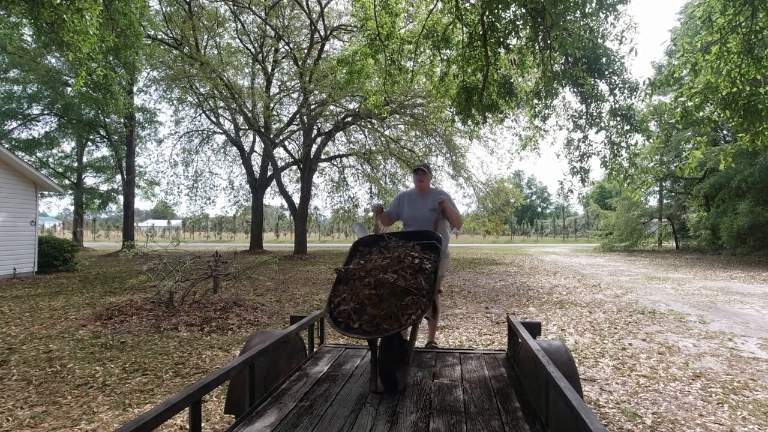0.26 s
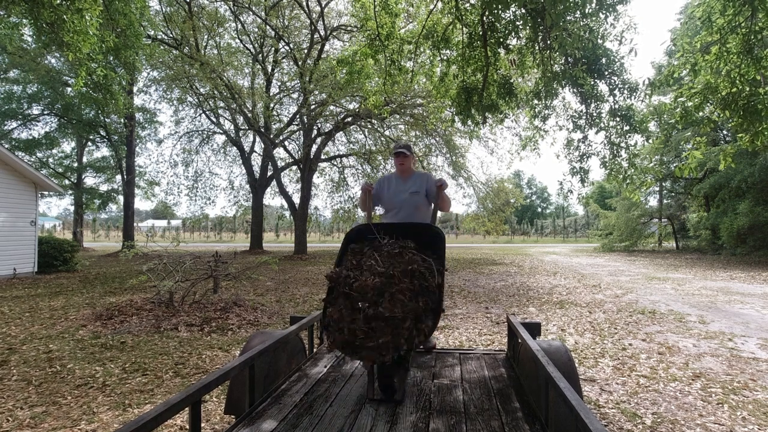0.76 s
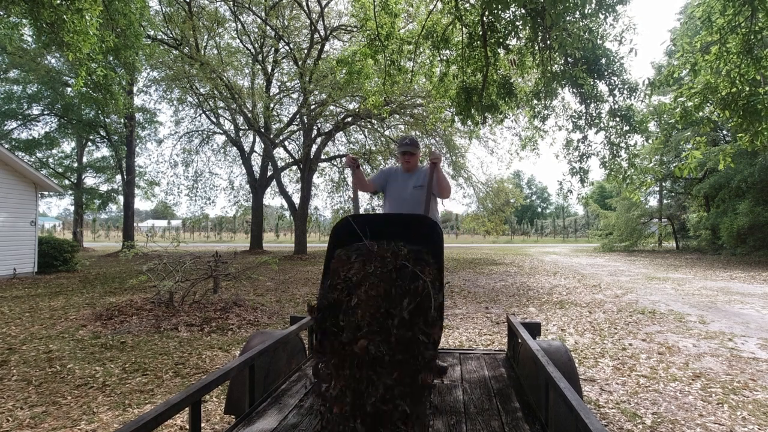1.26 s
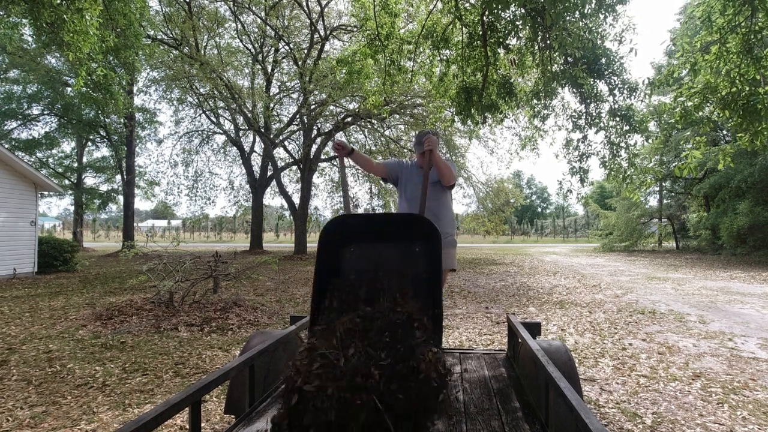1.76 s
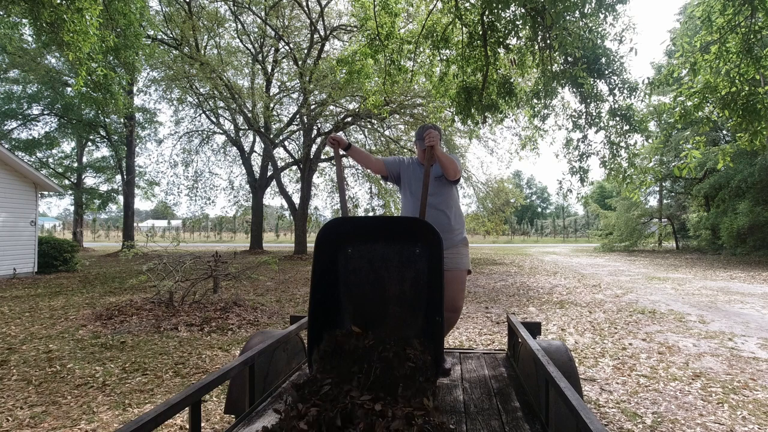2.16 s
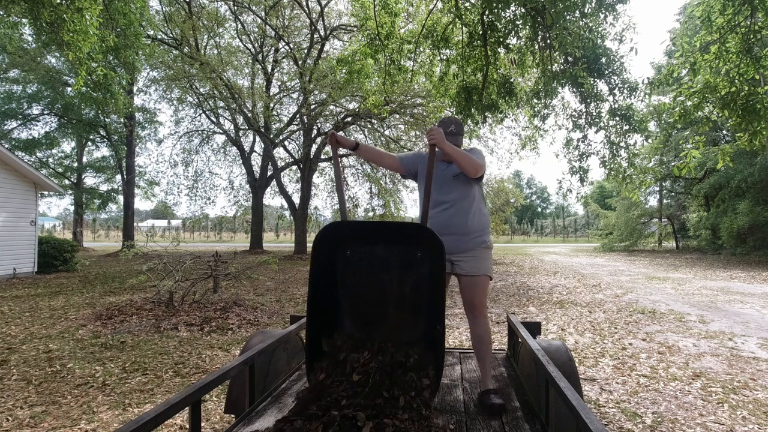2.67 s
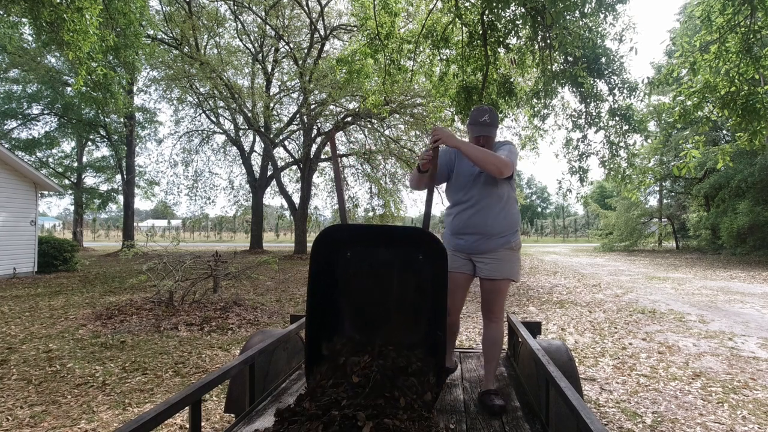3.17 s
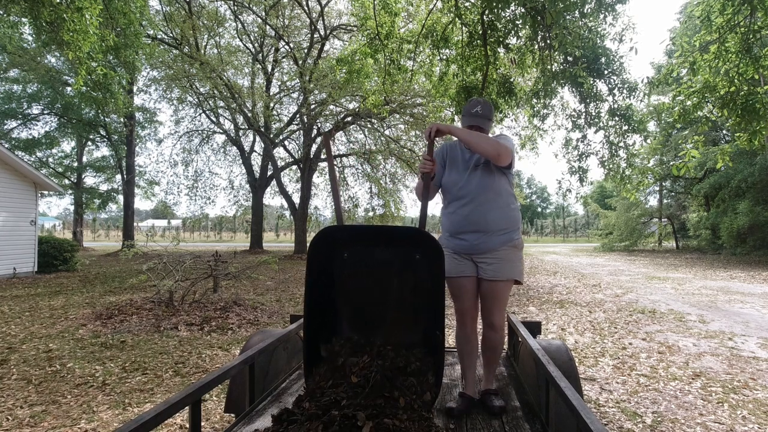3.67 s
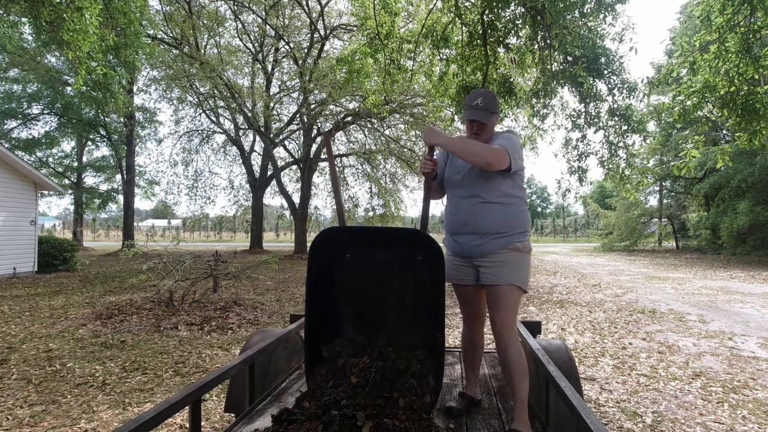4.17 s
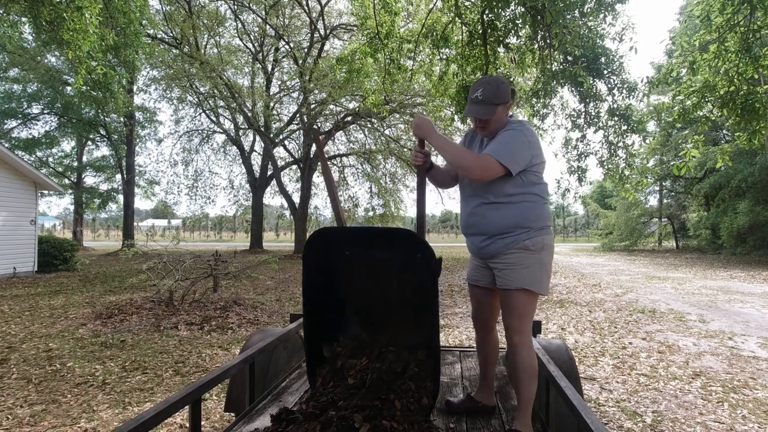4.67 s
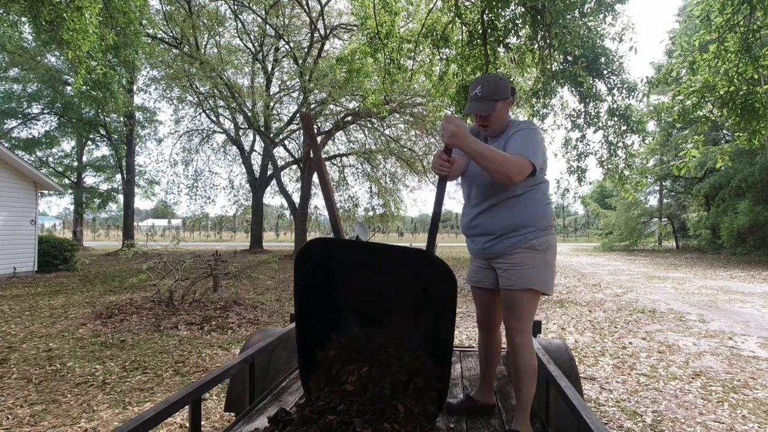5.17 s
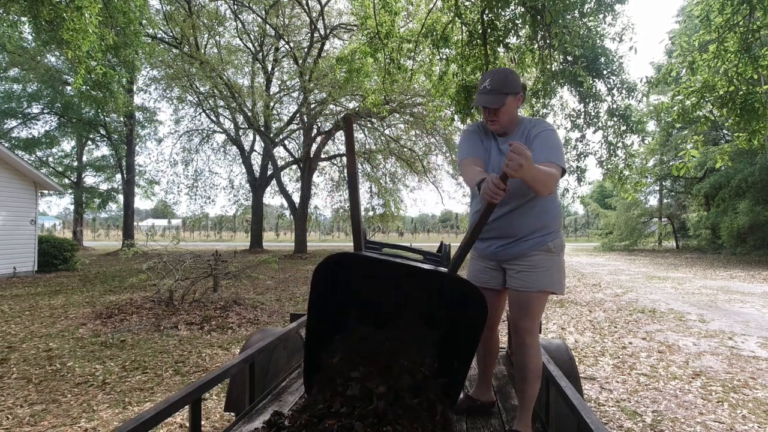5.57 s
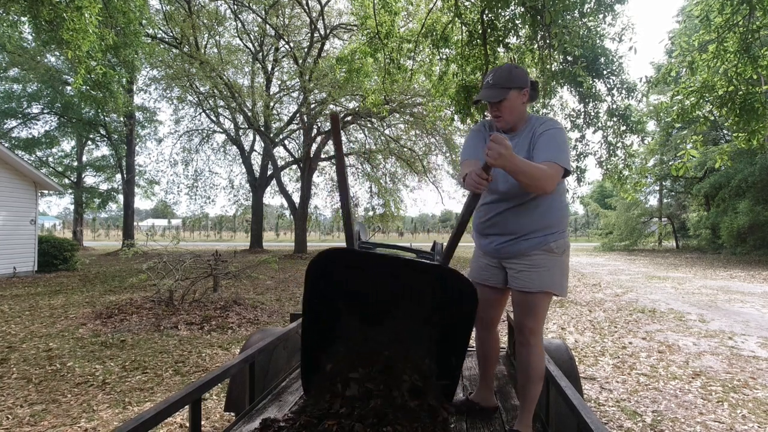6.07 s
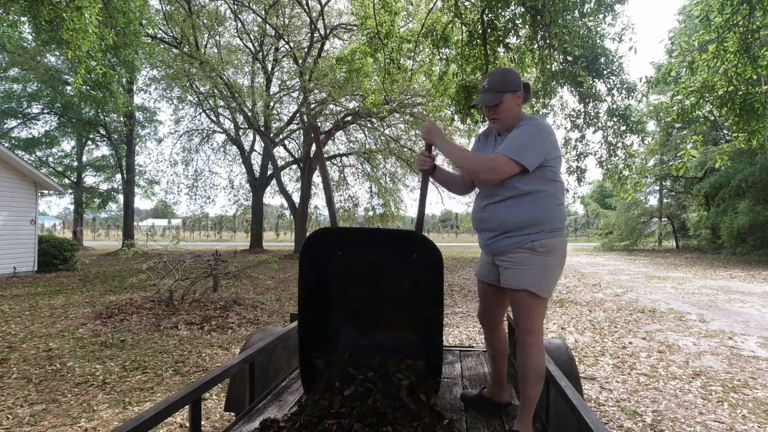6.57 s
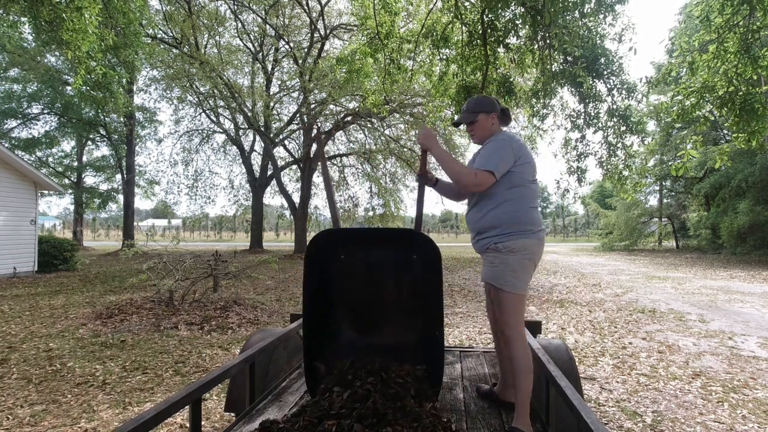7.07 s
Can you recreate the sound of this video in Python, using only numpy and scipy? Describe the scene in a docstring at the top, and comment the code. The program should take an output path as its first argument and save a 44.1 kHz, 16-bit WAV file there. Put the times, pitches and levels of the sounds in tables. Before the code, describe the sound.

Heard from a close microphone on the trailer bed: deep wheel rumble, then about a second and a half of bright leafy rustling with hollow knocks as the load slides out. One footstep thumps, quiet litter crunches and twigs snap. The hollow tub scrapes with a low groaning drone and gritty scratches, then slams down, rattling planks and steel, leaving a fading buzz in soft outdoor air.

```python
"""First wheel rumble, bumps and a faint leafy rustle: a plastic wheelbarrow rolls onto a plank trailer outdoors.
It is tipped and dry leaves and compost pour out; a foot lands, twigs snap, and the upended tub's rim grinds
over the boards. The tub drops back with a bouncing thud that sets the trailer booming.
Leaves, litter and grit are bursts of tiny random clicks, filtered; wood, tub and bed are ringing sines started
by clicks; the drone is clicks through narrow resonances; bird and squeaks are sines with moving pitch."""
import sys
import numpy as np
from scipy import signal
from scipy.fft import rfft, irfft
from scipy.io import wavfile
from scipy.ndimage import uniform_filter1d

SR = 44100
rng = np.random.default_rng(int(sys.argv[2]) if len(sys.argv) > 2 else 0)


def file_out(sig):
    """Save sig as 16-bit WAV at sys.argv[1]."""
    # one column per channel
    cols = np.atleast_2d(sig).T
    # limit, then scale
    lim = np.clip(cols, -1, 1)
    pcm = np.round(lim * 32767).astype(np.int16)
    wavfile.write(sys.argv[1], SR, pcm)


N = 323253
T = np.arange(N) / SR
# In all tables fade_s is the time to fade by 60 dB; levels are before the final mix.
# In colour tables only the differences between levels matter.


def from_db(db):
    """Turns decibels into a plain factor."""
    return 10 ** (np.asarray(db) / 20)


def rms_one(x):
    """Scales a sound to an average strength (rms) of 1."""
    return x / np.sqrt(np.mean(x ** 2) + 1e-20)


def drift(rate):
    """Slow chance with spread 1, made at every 40th sample and joined by straight lines."""
    r = np.exp(-80 * np.pi * rate / SR)
    noise = rng.standard_normal(N // 40 + 2002)
    slow = signal.lfilter([1], [1, -2 * r, r * r], noise)[2000:]  # the start-up is dropped
    return np.interp(np.arange(N) / 40, np.arange(len(slow)), rms_one(slow))


def cut(x, hz, kind, order=2):
    """Keeps what lies below ("low") or above ("high") a pitch."""
    return signal.sosfilt(signal.butter(order, np.clip(hz, 10, .45 * SR), kind, fs=SR, output="sos"), x)


def colour(x, spectrum, size=8192):
    """Causal filter of unit power with the given spectrum, falling steeply past its ends."""
    hz, db = np.transpose(spectrum)
    octave = np.log2(np.maximum(np.fft.rfftfreq(size, 1 / SR), 1))
    known = np.log2(hz)
    outside = np.abs(octave - np.clip(octave, known[0], known[-1]))
    level_db = np.interp(octave, known, db) - 24 * np.minimum(outside, 3)
    # folding the cepstrum forward in time makes the filter respond as early as it can
    cepstrum = irfft(np.log(from_db(level_db)))
    cepstrum[1:size // 2] *= 2
    cepstrum[size // 2 + 1:] = 0
    response = irfft(np.exp(rfft(cepstrum)))
    return signal.oaconvolve(x, response / np.linalg.norm(response))[:N]


def ring(x, hz, t60):
    """A unit click sets a dying sine of height 1 ringing."""
    r = from_db(-60 / (t60 * SR))
    w = 2 * np.pi * hz / SR
    return signal.lfilter([0, np.sin(w)], [1, -2 * r * np.cos(w), r * r], x + 1e-18)


def resonance(x, hz, width_hz):
    """Band-pass that keeps the power of white noise."""
    r = np.exp(-np.pi * width_hz / SR)
    gain = np.sqrt((1 - r * r) / 2)
    poles = [1, -2 * r * np.cos(2 * np.pi * hz / SR), r * r]
    return signal.lfilter(gain * np.array([1, 0, -1]), poles, x + 1e-18)


def grains(per_s, spread_db, clump_db):
    """Tiny random fractures of uneven size that come in clumps; rms 1."""
    height_db = spread_db * np.minimum(rng.exponential(1, N), 4)
    sizes = from_db(height_db) * rng.choice([-1, 1], N)
    born = rng.random(N) < per_s / SR
    return rms_one(born * sizes / np.sqrt(per_s) * from_db(clump_db * drift(24.5)))


def strikes(times, db, way=1):
    """One click for each contact."""
    out = np.zeros(N)
    out[np.clip((np.asarray(times) * SR).astype(int), 0, N - 1)] = from_db(db) * way
    return out


def dying(clicks, t60):
    """Envelope that jumps at each click and dies away."""
    return signal.lfilter([1], [1, -from_db(-60 / (t60 * SR))], clicks + 1e-18)


# a contact spreads over a few milliseconds as tub and planks give
CONTACT_S = 0.0038


def contact(envelope):
    """Rounds the attack of an envelope."""
    keep = np.exp(-1 / (CONTACT_S * SR))
    return signal.lfilter([1 - keep], [1, -keep], envelope)


def curve(rows, fade_db_per_s=200):
    """A level in dB through time, fading after its last point."""
    s, db = np.transpose(rows)
    return np.interp(T, s, db) - fade_db_per_s * np.maximum(T - s[-1], 0)


def swell(start_s, length_s, skew=1.0, roundness=0.84):
    """Envelope of one stroke, rising to 1 and falling; a skew over 1 makes it peak late."""
    part = np.clip((T - start_s) / length_s, 0, 1)
    inside = (part > 0) & (part < 1)
    out = np.zeros(N)
    out[inside] = np.abs(np.sin(np.pi * part[inside] ** skew)) ** roundness
    return out


def struck(modes, s, level_db):
    """Each blow strikes every mode with a random strength and sign."""
    shape = (len(s), len(modes))
    strength_db = rng.normal(0, 1.2, shape)
    way = rng.choice([-1, 1], shape)
    out = np.zeros(N)
    for k, (hz, db, t60) in enumerate(modes):
        out += ring(strikes(s, level_db + db + strength_db[:, k], way[:, k]), hz, t60)
    return out


# the tub flexes as it is pushed, so its resonances waver
FLEX_SHARE, FLEX_PER_S = .022, 7  # share of the pitch, wavers per second


def flex(x):
    """Bends the pitch of the tub's ringing a little, at random."""
    delay_s = FLEX_SHARE / (2 * np.pi * FLEX_PER_S) * drift(FLEX_PER_S)
    return np.interp(T + delay_s, T, x)


# colour of the open air: pitch_hz, level_db (per Hz)
AIR_COLOUR = [(22, 3), (35, -3.5), (58, 4.5), (85, -6.5), (120, -11.5), (170, -13.5), (235, -9),
              (300, -15.5), (500, -18.5), (900, -18), (1640, -23.5), (2300, -29), (7000, -42), (15000, -54)]
AIR_DB = -52.5


def open_air():
    """Soft low rumble and hiss of the yard, with a far-off hum, all from filtered noise."""
    air = colour(rng.standard_normal(N), AIR_COLOUR)
    hum = resonance(rng.standard_normal(N), 110.5, 18.3)
    return from_db(AIR_DB) * air + from_db(-57.0) * hum


BIRD_S, BIRD_LENGTH_S, BIRD_DB = 3.25, .16, -66
BIRD_HZ, BIRD_FALL_HZ_PER_S = 2890, 300


def bird():
    """A far bird's thin, slightly falling whistle from the trees: one sine with a trembling pitch."""
    pitch = (BIRD_HZ - BIRD_FALL_HZ_PER_S * (T - BIRD_S)) * (1 + 0.0057 * drift(42))
    whistle = np.sin(2 * np.pi * np.cumsum(pitch) / SR)
    return from_db(BIRD_DB) * swell(BIRD_S, BIRD_LENGTH_S, skew=1.5) * whistle


# clods of compost slide down the tub: start_s, length_s, level_db
CLOD_SLIDES = [(0.627, 0.17, -42.5), (1.03, 0.16, -45.5), (1.23, 0.089, -56), (1.831, 0.56, -39.5)]


def clods():
    """Envelope of the sliding clods."""
    return sum(from_db(db) * swell(s, length, skew=0.5, roundness=1.0) for s, length, db in CLOD_SLIDES)


# how hard wheel and load shake the deck: time_s, level_db
DECK_SHAKE = [(0.0, -27.5), (0.25, -34.5), (0.54, -29.5), (1.32, -43), (1.34, -45.5), (2.08, -44.5),
              (2.14, -33), (2.39, -71), (2.6, -73)]
# colour of the deck's rumble under the wheel: pitch_hz, level_db (per Hz)
RUMBLE_COLOUR = [(22, -5), (35, -2), (55, 1), (70, -2.5), (90, -14), (125, -14), (170, -22)]
# colour of the load rubbing along the tub: pitch_hz, level_db (per Hz)
RUB_COLOUR = [(65, -17), (110, -27), (166, 0.5), (224, 3), (269, -9.5), (312, -0.5), (521, -7), (559, -2.5),
              (600, -2.5), (780, -19), (1320, -120)]
# loose planks and side rails: pitch_hz, level_db, fade_s (the fade counts only when they are struck)
RAIL_MODES = [(561, -7, 0.18), (696, -1, 0.063), (783, -2.5, 0.13), (945, -11, 0.058), (1083, -18, 0.28),
              (1290, -26, 0.029), (1440, -31, 0.035)]


def rolling():
    """The wheel and the shifting load shake the deck, rub along the tub and make the side rails chatter."""
    shake = from_db(curve(DECK_SHAKE))
    rub = from_db(-18) * shake + from_db(-16.5) * from_db(curve(LEAF_FLOW)) + from_db(-4.0) * clods()
    rumble_level = from_db(-2.0) * shake + from_db(-27) * clods()
    rumble = rumble_level * colour(grains(1800, spread_db=3.0, clump_db=4.0), RUMBLE_COLOUR)
    rubbing = colour(grains(1500, spread_db=1.0, clump_db=5.0) * rub, RUB_COLOUR)
    jolts = grains(400, spread_db=-7.0, clump_db=-2.0)
    chatter = rms_one(sum(resonance(jolts, hz, hz / 22) * from_db(0.72 * db) for hz, db, _ in RAIL_MODES))
    return rumble + from_db(-4.0) * rubbing + from_db(-23.0) * shake * chatter


# trailer bed on its springs: pitch_hz, level_db, fade_s
BED_MODES = [(34.4, -5, 1.4), (39.95, -11.5, 2.3), (58, 3.5, 0.29), (63.07, -4, 0.84), (83.4, -14.5, 0.37),
             (115, -10.5, 0.57)]


def deck_boom(s, level_db, boom_hz):
    """The bed swings on its springs; the bending modes near the pitch of the blow answer most."""
    swing = np.zeros(N)
    for k, (hz, db, t60) in enumerate(BED_MODES):
        off_pitch_db = 14 * np.abs(np.log2(hz / boom_hz))  # 14 dB weaker per octave away
        swing += ring(strikes(s, level_db + db - off_pitch_db), hz, t60) * (-1) ** k
    return cut(swing, 110, "low")


# colour of the loaded tub's dull thump: pitch_hz, level_db (per Hz)
THUMP_COLOUR = [(110, -7), (170, -10), (250, -6), (400, -9), (700, -29.5)]
THUMP_T60_S = .045


def thump(s, level_db):
    """The dull part of a blow: one firm push, then a short shudder."""
    blow = strikes(s, level_db)
    shudder = rng.standard_normal(N) * contact(dying(blow, THUMP_T60_S))
    return colour(from_db(14.0) * blow + from_db(-6.5) * shudder, THUMP_COLOUR)


# colour of the planks' dry knock: pitch_hz, level_db (per Hz)
PLANK_COLOUR = [(300, -1), (480, -3.5), (700, 6), (900, -0.5), (1400, -6), (2000, -17.5), (5000, -28)]


def clack(s, level_db):
    """Loose planks knock and rattle on unevenly, and the side rails ring."""
    knock = strikes(s, level_db)
    rattle = dying(knock, 0.037) + from_db(-19.5) * dying(knock, 0.74) * from_db(1.1 * drift(40))
    planks = colour(rng.standard_normal(N) * contact(rattle), PLANK_COLOUR)
    return from_db(-4.0) * planks + struck(RAIL_MODES, s, level_db - 4.0)


# hollow tub and its longer-ringing steel frame: pitch_hz, level_db, fade_s
TUB_MODES = [(140, -1.5, 0.11), (193, -7, 0.24), (216.8, -4, 0.38), (227.8, -6, 0.36), (245.5, -9, 0.45),
             (288, -15, 0.45), (322, -15, 0.5), (344.1, -15, 0.74), (402, -14.5, 0.46), (453, -22, 0.8),
             (523, -22, 0.5), (795, -29, 1), (822, -28, 0.57), (930, -27, 0.24), (1030, -31, 0.4),
             (1945, -36, 0.8)]
# the wheel drops over gaps between planks: time_s, knock_db, deck_boom_db, boom_pitch_hz
WHEEL_BUMPS = [(.01, -43, -50, 45), (0.069, -45, -45, 100), (0.422, -48, -24, 38), (0.51, -48, -24.5, 42.3),
               (.567, -38, -48, 110), (0.612, -40.5, -26.5, 57), (0.76, -62, -25, 58),
               (0.839, -38.5, -37, 59.7)]


def wheel_bumps():
    """The soft tyre mostly rocks the deck, with a little knock from tub and planks."""
    s, db, boom_db, boom_hz = np.transpose(WHEEL_BUMPS)
    knocks = thump(s, db) + struck(TUB_MODES, s, db) + from_db(-2.5) * clack(s, db)
    return deck_boom(s, boom_db, boom_hz) + knocks


# debris jolted loose lands on the deck: time_s, level_db, fade_s
DEBRIS_LANDINGS = [(6.811, -30, 0.056), (6.828, -43, 0.71), (6.868, -32.5, 0.17), (6.916, -34, 0.18)]


def debris():
    """A short, dying crunch for each handful."""
    landing = contact(sum(dying(strikes([s], db), t60) for s, db, t60 in DEBRIS_LANDINGS))
    crunch = grains(14000, spread_db=2.0, clump_db=2.0) * landing
    return colour(crunch, [(1200, 7.0), (2500, 0.5), (4100, -1.5), (6500, -6.5), (9000, -15.0), (15000, -33.0)])


# the steel frame buzzes on after the drop
DROP_S, BUZZ_HZ, BUZZ_WIDTH_HZ, BUZZ_DB, BUZZ_T60_S = 6.824, 801, 30, -45, 2.3


def frame_buzz():
    """Loose steel parts chatter in one narrow resonance and die away."""
    clicks = grains(900, spread_db=-4.0, clump_db=-5.0)
    chatter = resonance(resonance(clicks, BUZZ_HZ, 3 * BUZZ_WIDTH_HZ), BUZZ_HZ, BUZZ_WIDTH_HZ)
    return rms_one(chatter) * dying(strikes([DROP_S], BUZZ_DB), BUZZ_T60_S)


# a foot lands on the deck: heel first, then the sole, then the walker's weight
STEP_S, SOLE_LAG_S, WEIGHT_LAG_S = 2.7287, 0.0075, .039
# the shoe twists on grit as it takes the weight
SCUFF_S, SCUFF_LENGTH_S, SCUFF_HZ, SCUFF_WIDTH_HZ, SCUFF_DB = 2.76, 0.043, 1280, 520, -43


def footfall():
    """The heel clacks, the sole thumps and shakes the tub, the weight swings the bed as the shoe scuffs."""
    heel, sole, weight = STEP_S, STEP_S + SOLE_LAG_S, STEP_S + WEIGHT_LAG_S
    planks = clack([heel], level_db=-24) + clack([sole], level_db=-29)
    shoe = cut(thump([heel], level_db=-25) + thump([sole], level_db=-14), 100, "high")
    bed = deck_boom([weight], level_db=-20.0, boom_hz=63.0)
    bed = bed + thump([weight], level_db=-23.0) + clack([weight], level_db=-35)
    tub = struck(TUB_MODES, [sole], level_db=-30.5) + struck(TUB_MODES, [weight], level_db=-31.5)
    grit = grains(2500, spread_db=1.0, clump_db=0.5)
    for _ in range(2):
        grit = resonance(grit, SCUFF_HZ, SCUFF_WIDTH_HZ)
    scuff = from_db(SCUFF_DB) * swell(SCUFF_S, SCUFF_LENGTH_S, skew=0.37) * rms_one(grit)
    return planks + shoe + bed + scuff + tub


# shoes and rim sweep through the litter: start_s, length_s, crunch_db, hiss_db
LITTER_SWEEPS = [(3.5, 0.14, -57.5, -69), (3.756, 0.39, -64, -66.5), (4.197, 0.057, -52.5, -66),
                 (4.294, 0.71, -56.5, -68), (4.544, 0.32, -51.5, -77), (4.672, 0.13, -48, -73),
                 (4.877, 1, -53, -59), (5.42, 0.72, -54.5, -50), (6.072, 0.72, -49, -57.5),
                 (6.506, 0.33, -47, -55.5), (7.048, 0.25, -58, -64)]
# colour of the litter's crunch: pitch_hz, level_db (per Hz)
CRUNCH_COLOUR = [(500, -1), (900, 1.5), (1350, -1), (1700, 6), (2050, -2.5), (2800, -0.5), (3800, -2),
                 (5000, -6), (7000, -10), (9500, -32), (15000, -39)]
# colour of the litter's fine hiss: pitch_hz, level_db (per Hz)
HISS_COLOUR = [(3000, -6.5), (5500, -2.5), (7600, -2), (9300, -7), (10500, -14), (12500, -16), (15500, -25)]


def litter():
    """Shoes and the rim of the tub crush and push the leaves that lie on the boards."""
    strokes = np.array([swell(s, length, skew=0.95, roundness=0.55) for s, length, _, _ in LITTER_SWEEPS])
    _, _, crunch_db, hiss_db = np.transpose(LITTER_SWEEPS)
    # overlapping strokes add in power
    coarse, fine = (np.sqrt(from_db(db) ** 2 @ strokes ** 2) for db in (crunch_db, hiss_db))
    crunch = colour(grains(9000, spread_db=1.0, clump_db=2.0), CRUNCH_COLOUR)
    hiss = colour(grains(5100, spread_db=-6.0, clump_db=2.0), HISS_COLOUR)
    return coarse * crunch + fine * hiss


# rim slipping over grit: time_s, scratch_db, squeal_db, fade_s (of the scratch)
RIM_SLIPS = [(4.967, -41, -73, 0.12), (6.145, -35, -48, 0.17), (6.53, -55, -54, .2)]


def rim_slips():
    """The rim lets go with a scratch and a short rough squeal, both from filtered noise."""
    scratch = colour(rng.standard_normal(N), [(900, 2.0), (2400, 1.5), (3300, 10.0), (5000, 3.5),
                                              (8000, 0.5), (10000, -10.5), (14000, -29)])
    squeal = resonance(resonance(rng.standard_normal(N), 1620, 240), 1670, 210)
    scratch_env = sum(dying(strikes([s], db), t60) for s, db, _, t60 in RIM_SLIPS)
    squeal_env = sum(dying(strikes([s], db), 4.5 * t60) for s, _, db, t60 in RIM_SLIPS)
    return scratch * scratch_env + rms_one(squeal) * squeal_env


# a short rough squeak and one brief high clink: start_s, length_s, pitch_hz (middle), level_db (middle)
SHORT_SQUEAKS = [(6.151, 0.067, 1680, -43.5), (6.915, .02, 4000, -34)]
SQUEAK_FALL, SQUEAK_WOBBLE = .015, .036  # shares of the pitch


def squeaks():
    """A short squeak and a brief high clink: sines roughened by fast random pitch and level, sinking slightly."""
    out = np.zeros(N)
    for s, length, hz, db in SHORT_SQUEAKS:
        gone = np.clip((T - s) / length, 0, 1)
        pitch = hz * (1 + SQUEAK_FALL * (.5 - gone) + SQUEAK_WOBBLE * drift(118))
        level = from_db(db + 5.4 * drift(90)) * swell(s, length, skew=0.65, roundness=0.59)
        out += level * np.sin(2 * np.pi * np.cumsum(pitch) / SR)
    return out


def stalk_ticks(per_s, count=16):
    """Stiffer leaves and stalks flick, each at one of several pitches; rms 1."""
    flicks = grains(per_s, spread_db=2.5, clump_db=0.0)
    dealt = rng.integers(0, count, N)  # which pitch each flick gets
    pitches = np.geomspace(1590, 7800, count)
    return rms_one(sum(resonance(flicks * (dealt == k), hz, hz / 13) for k, hz in enumerate(pitches)))


# twigs and leaf stalks snapping: time_s, peak_db (before the last filters), pitch_hz, fade_s
TWIG_SNAPS = [(0.505, -35.5, 2600, .04), (0.984, -21, 1870, 0.028), (1.032, -21, 1330, 0.033),
              (1.091, -19.5, 5800, 0.045), (2.832, -33.5, 4340, .025), (2.869, -20, 3300, 0.0056),
              (2.883, -29, 7000, 0.013), (3.109, -38.5, 4560, 0.021), (3.147, -43, 7000, .025),
              (3.238, -48, 9000, .015), (3.474, -47, 4850, 0.035), (4.287, -42.5, 3400, 0.13),
              (4.319, -32.5, 2070, 0.018), (4.377, -37.5, 4080, 0.024), (4.458, -37.5, 2960, 0.025),
              (4.51, -39, 2870, 0.025), (4.783, -39, 3030, 0.036), (5.167, -38, 2600, .04),
              (5.203, -40, 1900, .04), (5.252, -29, 1280, 0.041), (7.106, -43, 7040, 0.037),
              (7.144, -40.5, 6900, .018)]
# each snap starts with a bright crack, splinters on and knocks the board beneath it
CRACK_DB, CRACK_T60_S = -6, .006
SPLINTER_DB, SPLINTER_T60_S, BOARD_HZ, BOARD_DB = -25, .11, 1020, -11
# smaller stalks give way at random underfoot
TREAD_FROM_S, TREAD_LENGTH_S, STALKS_PER_S, STALKS_DB = 3.05, 3.4, 130, -67.5


def twigs():
    """A stalk ticks at its own pitch, splinters on and knocks the board; smaller ones crack at random."""
    tread = swell(TREAD_FROM_S, TREAD_LENGTH_S, roundness=0.61)
    out = from_db(STALKS_DB) * tread * stalk_ticks(per_s=STALKS_PER_S)
    for s, db, hz, t60 in TWIG_SNAPS:
        start = int(s * SR)
        age = T[:min(N - start, SR // 8)]
        fade = from_db(-60 * age / t60) + from_db(SPLINTER_DB - 60 * age / SPLINTER_T60_S)
        burst = rng.standard_normal(len(age)) * fade
        tick = resonance(burst, hz, 1100) + from_db(BOARD_DB) * resonance(burst, BOARD_HZ, 320)
        tick = tick + rng.standard_normal(len(age)) * from_db(CRACK_DB - 60 * age / CRACK_T60_S)
        out[start:start + len(age)] += from_db(db) * tick / np.abs(tick).max()
    return cut(cut(out, 480, "high"), 8000, "low")


# the rim grips again as the tub's swing sinks, which evens the drone
GRIP_S, GRIP_SHARE = .025, .65  # averaging time, share of the unevenness removed


def evened(x):
    """Holds a rubbed resonance near a steady swing; rms 1."""
    power = uniform_filter1d(rms_one(x) ** 2, int(GRIP_S * SR))
    return rms_one(x / np.maximum(power, 1e-6) ** (GRIP_SHARE / 2))


# the rim is pushed over the boards: start_s, length_s, drone_db, upper_drone_db, grit_db
RIM_PUSHES = [(2.572, 0.15, -46.5, -64, -75), (4.513, 0.28, -53, -50, -59),
              (4.615, 0.52, -45.5, -57.5, -64), (4.886, 0.16, -60, -51, -59), (5.07, 0.3, -45.5, -43, -50),
              (5.22, 0.45, -39, -50.5, -47.5), (5.578, 0.23, -49.5, -62, -59)]
# resonances of the tub under a dragged rim: pitch_hz, width_hz, level_db
DRONE_MODES = [(222.6, 12.2, 27), (245, 11, -12)]
# upper resonances of the tub under the dragged rim: pitch_hz, width_hz, level_db
UPPER_DRONE_MODES = [(345.3, 16, 32), (357, 4.2, -6), (410, 25, -25)]
# boards and tub wall sing under the dragged rim: pitch_hz, width_hz, level_db
BOARD_MODES = [(794, 53, -2), (907, 50, 0), (1230, 19, -3), (1750, 55, -10)]
BOARD_MODES_DB = -3.5
# colour of the crunching grit: pitch_hz, level_db (per Hz)
GRIT_COLOUR = [(260, -32), (450, 17), (498, -20), (587, -5), (888, 10), (1110, 6), (1230, 5), (1350, -11),
               (1600, 1), (2080, -30), (3520, -120)]


def grinding():
    """The rim sticks and slips: the tub drones in two groups of resonances, boards sing, grit crunches."""
    strokes = np.array([swell(s, length, skew=0.89, roundness=0.75) for s, length, *_ in RIM_PUSHES])
    _, _, *levels_db = np.transpose(RIM_PUSHES)
    low, upper, grit = (np.sqrt(from_db(db) ** 2 @ strokes ** 2) for db in levels_db)
    slips = grains(1500, spread_db=1.5, clump_db=0.0)

    def sing(modes):
        return rms_one(sum(from_db(db) * resonance(slips, hz, width) for hz, width, db in modes))
    drone = low * evened(sing(DRONE_MODES)) + upper * evened(sing(UPPER_DRONE_MODES))
    tub = flex(cut(drone, 500, "low"))
    crunch = colour(grains(1800, spread_db=2.5, clump_db=1.0), GRIT_COLOUR)
    return tub + grit * (from_db(-3.0) * crunch + from_db(BOARD_MODES_DB) * sing(BOARD_MODES))


# short hollow pitched knocks of loose planks under some of the blows: time_s, level_db, pitch_hz
SLAP_HITS = [(1.0685, -18.5, 814), (2.7285, -20.5, 850), (2.7365, -18, 710), (5.259, -33, 686),
             (6.8245, -7.5, 746), (6.876, -19, 820)]
SLAP_RISE_S, SLAP_T60_S, SLAP_UPPER_RATIO, SLAP_UPPER_DB = .003, .024, 1.55, -17


def plank_slaps():
    """A loose plank flexes and gives one short, hollow, pitched knock with a weaker upper tone."""
    def knock(s, db, hz):
        click = strikes([s], db)
        # taking away a faster-dying ring softens the start; ln(1000) / 2 turns the rise into its fade
        return ring(click, hz, SLAP_T60_S) - ring(click, hz, SLAP_RISE_S * np.log(1000) / 2)
    out = np.zeros(N)
    for s, db, hz in SLAP_HITS:
        out += 2 * (knock(s, db, hz) + knock(s, db + SLAP_UPPER_DB, hz * SLAP_UPPER_RATIO))
    return out


# knocks on the deck: the tub's hits, falling clods and a last soft tap: time_s, force_db,
# then relative to the force: contact_hardness_db, tub_ring_db, thump_db
DECK_HITS = [(1.031, -47, 12.5, -2, -7), (1.068, -28, -2.5, -3, -7), (1.076, -39, -6, -5, -3),
             (1.101, -38, 6, -7, 7), (1.118, -39, 2, -10, -2), (1.146, -48, 13, -15, -2),
             (1.233, -31.5, -2, -25, 5), (1.25, -41, 2, 1, -3), (1.628, -42.5, -11, 1.5, 3),
             (1.901, -42.5, -3, 5, -3), (2.147, -48, 2, 3, -1), (5.245, -35.5, -3, -9, 1),
             (5.257, -30, -4.5, -19, 3), (5.309, -41.5, -11, 1, 2), (5.666, -46, -2, -8, 6),
             (6.806, -18, -1.5, -6.5, 5), (6.812, -24.5, 0, -9, 0), (6.821, -23, -0.5, -7, 6),
             (6.843, -24.5, -13, -3, 11), (6.869, -18, -6, -6, 0), (6.883, -29, -1, -5, -5),
             (6.896, -27, -9, -3, 7), (6.92, -25.5, -12, 2, 7), (6.945, -23, -8, -8, -3),
             (6.993, -39, -8, -11, 11), (7.025, -40, -4, -3, 1), (7.226, -46, -9, 0, 6),
             (7.294, -34.5, -18, -14, 11)]
# a heavier hit rocks the bed much more, and in a deeper mode: values at a full-force hit and change with force
FULL_HIT_DB = -19
BOOM_DB, BOOM_FOLLOWS, BOOM_HZ, BOOM_DB_PER_OCTAVE = -14, 1.5, 44.5, 9
# while it is still loaded, the tub answers each hit with a short deep thud
EMPTY_S, LOADED_HZ, LOADED_T60_S, LOADED_DB = 1.2, 162, 0.18, 4.5


def deck_hits():
    """Each hit rocks the deck and rings the tub; hard contacts also knock the planks."""
    s, db, hardness_db, ring_db, thump_db = np.transpose(DECK_HITS)
    heavier_db = db - FULL_HIT_DB
    boom_hz = BOOM_HZ * 2 ** (-heavier_db / BOOM_DB_PER_OCTAVE)
    boom = deck_boom(s, BOOM_DB + BOOM_FOLLOWS * heavier_db, boom_hz)
    loaded = s < EMPTY_S
    thud = ring(strikes(s[loaded], db[loaded] + LOADED_DB), LOADED_HZ, LOADED_T60_S)
    tub = flex(struck(TUB_MODES, s, db + ring_db))
    return boom + thud + thump(s, db + thump_db) + tub + clack(s, db + hardness_db)


# the pour brightens as the tub turns to face the microphone
LATE_POUR_S, BRIGHTEN_DB_PER_S = 2.7, 0.77
# the load rasps along the tub wall, whose pitch sinks as it empties (WALL_HZ: the pitch near the end of the pour)
WALL_HZ, WALL_SINK_HZ_PER_S, WALL_WIDTH_HZ, WALL_DB = 1464, 130, 140, -11


def wall_rasp():
    """Narrow rough noise around the sinking pitch of the tub wall; rms 1."""
    pitch = WALL_HZ - WALL_SINK_HZ_PER_S * (T - LATE_POUR_S)
    wander = cut(rng.standard_normal((2, N)), WALL_WIDTH_HZ / 2, "low")
    phase = 2 * np.pi * np.cumsum(pitch) / SR
    return rms_one(wander[0] * np.cos(phase) + wander[1] * np.sin(phase))


# flow of leaves out of the tub, as the level of their rustle: time_s, level_db
LEAF_FLOW = [(0.0, -58), (0.03, -60.5), (0.34, -52.5), (0.36, -46.5), (0.39, -55), (0.58, -54), (0.61, -43),
             (1.18, -35), (1.21, -29.5), (2.06, -30), (2.44, -38), (2.72, -48.5)]
FULL_FLOW_DB, TRICKLE_FADE_DB_PER_S = -30, 32.5
# clumps of leaves break loose and fall: start_s, length_s, flow_rise_db
LEAF_CLUMPS = [(0.628, .13, 0), (0.762, .2, 2), (1.091, 0.018, 4.5), (1.202, 0.025, 3), (1.272, 0.08, 1.5),
               (1.503, 0.034, 1), (1.932, 0.099, -0.1)]
# colour of the leaves' rustle: pitch_hz, level_db (per Hz)
RUSTLE_COLOUR = [(1100, -5.5), (1600, 2), (2200, -2.5), (3000, 1.5), (4200, 2.5), (6400, 0.5), (7800, -4),
                 (9300, -13), (11000, -17), (15500, -45)]
# colour of the finest crackle: pitch_hz, level_db (per Hz)
FINE_COLOUR = [(5000, -5.5), (7500, 3.5), (9200, 0.5), (10700, -6.5), (12500, -9), (15500, -18)]
# colour of the heavier crumbs: pitch_hz, level_db (per Hz)
COMPOST_COLOUR = [(450, -7), (560, -10), (820, 6), (1000, 3), (1350, 0), (1590, 3.5), (1900, -4.5),
                  (2500, 2.5)]
# finest crackle and heavier crumbs: level at full flow, dB gained per dB of flow
FINE_DB, FINE_FOLLOWS = -33.5, 1.08
CRUMB_DB, CRUMB_FOLLOWS = -38.5, 0.93


def leaves():
    """Dry leaves crackle, more densely the more of them move; heavier crumbs patter below."""
    clumps_db = sum(db * swell(s, length) for s, length, db in LEAF_CLUMPS)
    rustle_db = curve(LEAF_FLOW, TRICKLE_FADE_DB_PER_S) + clumps_db
    rustle = from_db(rustle_db)
    flow_db = rustle_db - FULL_FLOW_DB
    fine = from_db(FINE_DB + FINE_FOLLOWS * flow_db + BRIGHTEN_DB_PER_S * (T - LATE_POUR_S))
    coarse = from_db(CRUMB_DB + CRUMB_FOLLOWS * flow_db)
    coarse = coarse + from_db(-1.0) * clods() + from_db(-30) * from_db(curve(DECK_SHAKE))
    per_s = 1500 + 12000 * rustle / rustle.max()
    crackle = rms_one(grains(per_s, spread_db=1.5, clump_db=1.0) + from_db(-3.0) * rng.standard_normal(N))
    ticks = stalk_ticks(per_s=440)
    body = rustle * (from_db(-0.15) * colour(crackle, RUSTLE_COLOUR) + from_db(-14.0) * ticks)
    top = fine * colour(grains(per_s, spread_db=-1.0, clump_db=1.4), FINE_COLOUR)
    patter = grains(per_s, spread_db=0.5, clump_db=0.8)
    crumbs = coarse * (colour(patter, COMPOST_COLOUR) + from_db(WALL_DB) * wall_rasp())
    surge = from_db(0.5 * drift(17.0))  # the load slides unevenly
    return (body + top + crumbs) * surge


WALL_LAG_S = .001408
# the tub and side rails throw the near sounds back: lag_s, level_db
NEAR_ECHOES = [(.0079, -18), (0.0119, -17)]


def scene():
    """A close wall of the trailer adds a short echo that ribs the rustle; both channels are the same."""
    near = leaves() + litter() + grinding() + twigs() + rim_slips() + squeaks()

    def late(lag_s):
        return np.pad(near, (round(lag_s * SR), 0))[:N]
    echoes = .2 * late(WALL_LAG_S) + sum(from_db(db) * late(lag) for lag, db in NEAR_ECHOES)
    blows = wheel_bumps() + footfall() + deck_hits() + plank_slaps() + frame_buzz() + debris()
    mono = from_db(-1.29) * (near + echoes) + blows + rolling() + bird() + open_air()
    return np.array([mono, mono])


CUTOFF_HZ = 15500


def record(dry):
    """The deepest bass and the top are cut."""
    low_pass = signal.ellip(10, .1, 80, CUTOFF_HZ, fs=SR, output="sos")
    return signal.sosfilt(low_pass, cut(dry, 8.8, "high"))


dry = scene()
out = record(dry)
file_out(out)
```